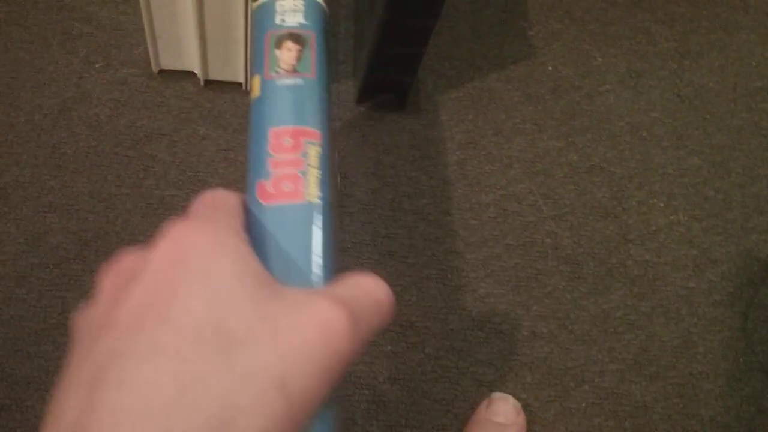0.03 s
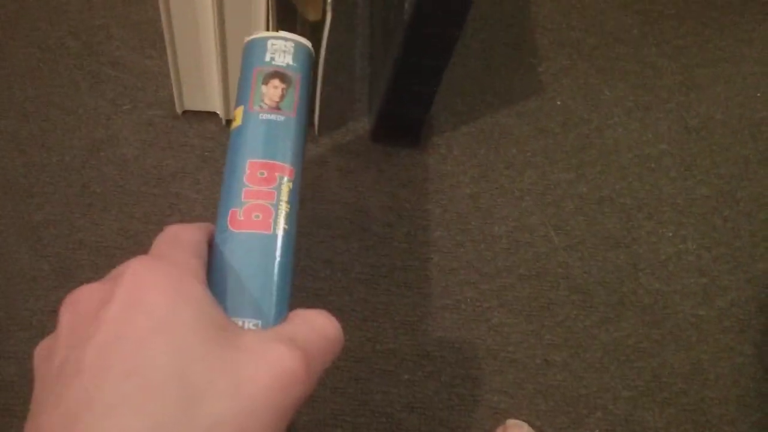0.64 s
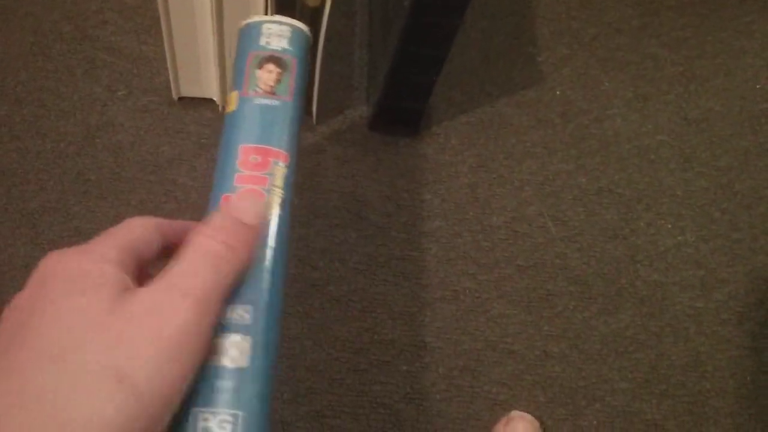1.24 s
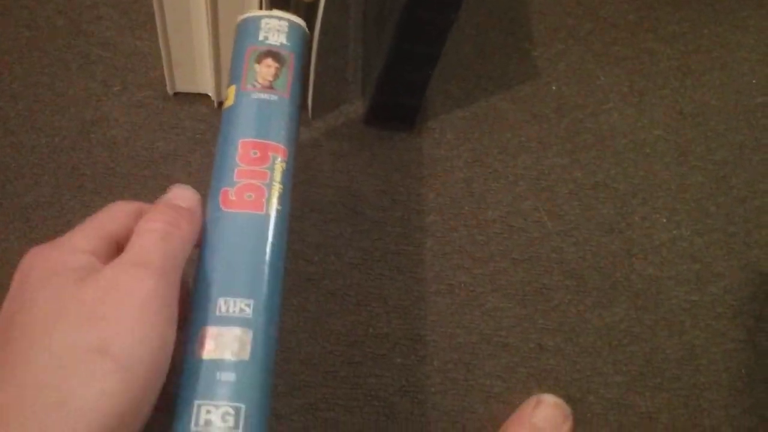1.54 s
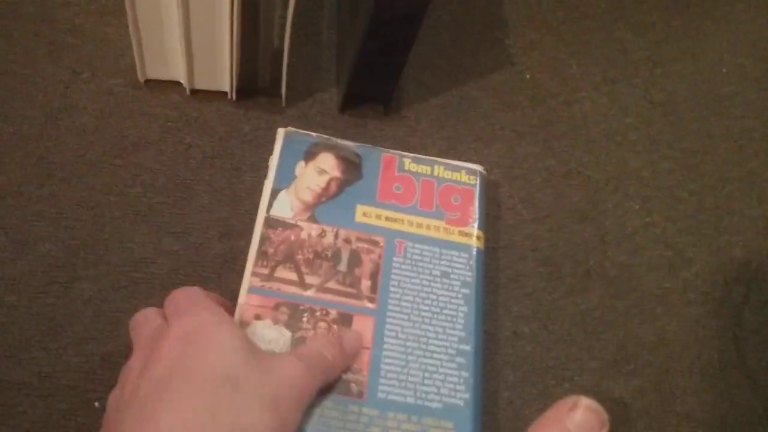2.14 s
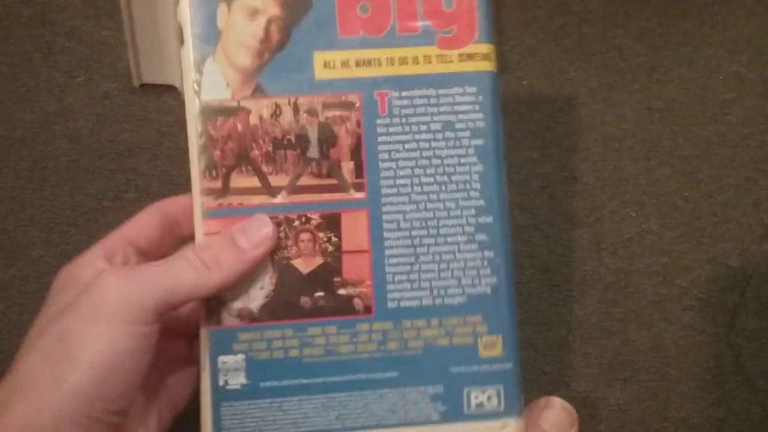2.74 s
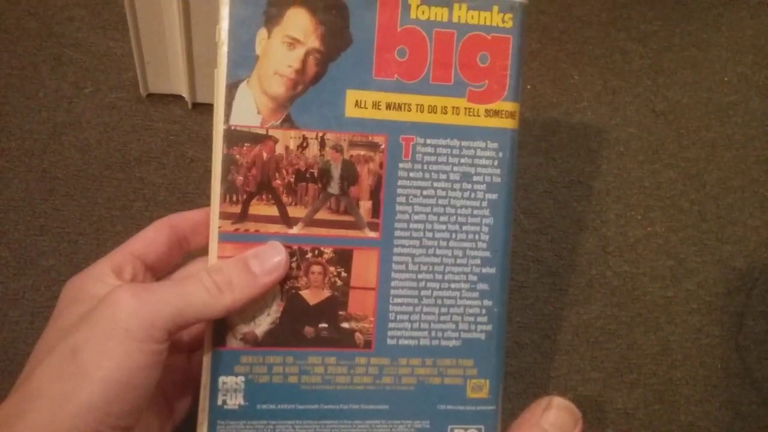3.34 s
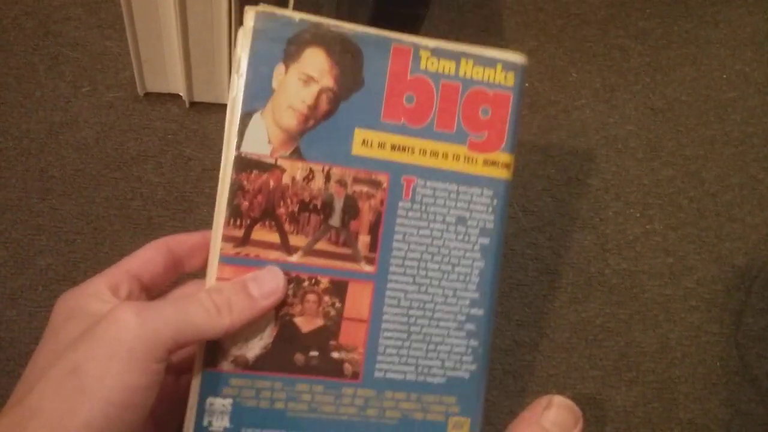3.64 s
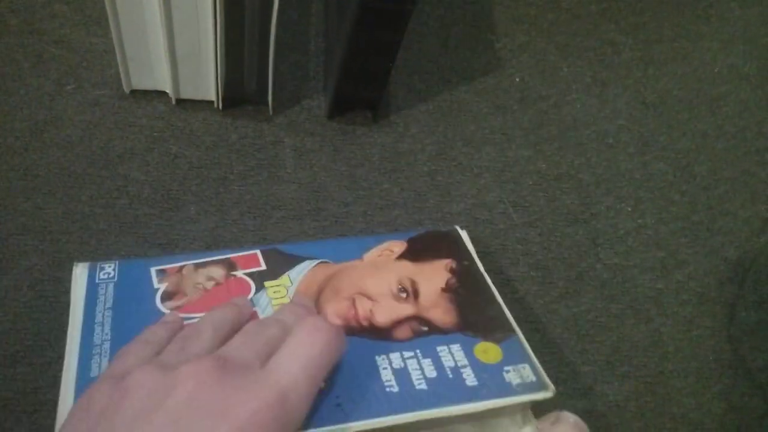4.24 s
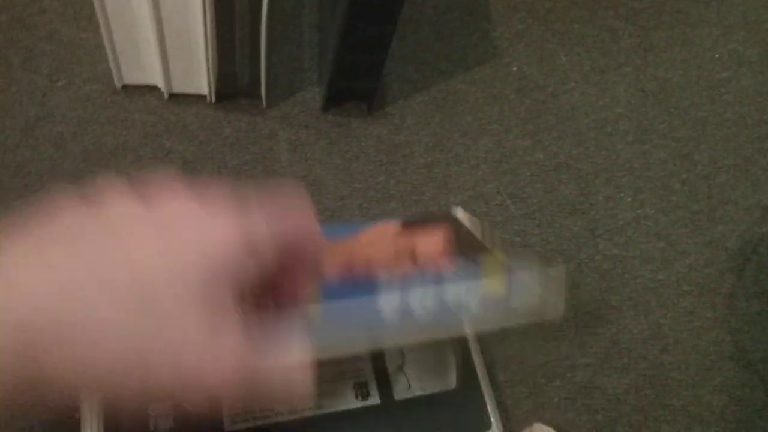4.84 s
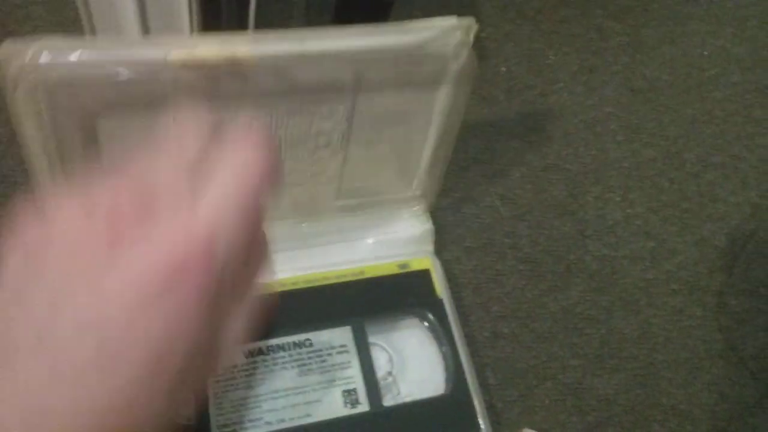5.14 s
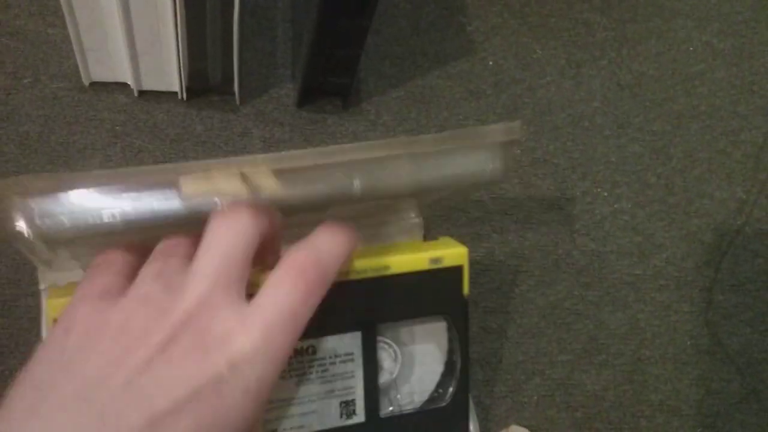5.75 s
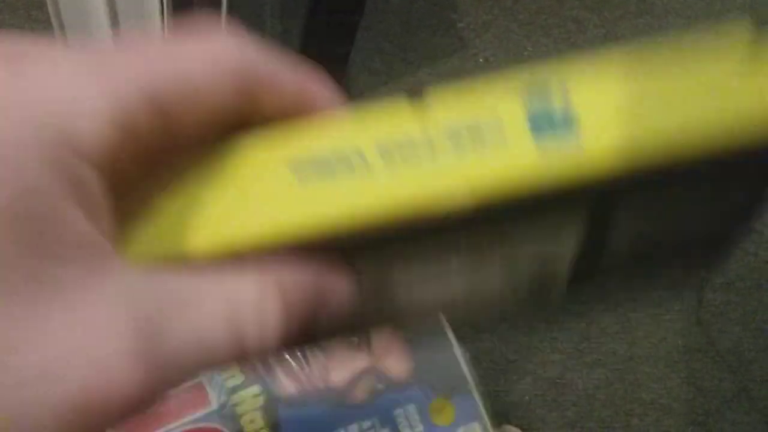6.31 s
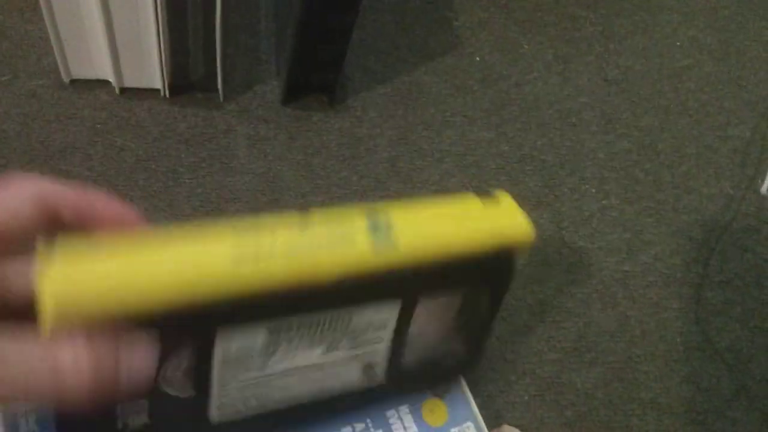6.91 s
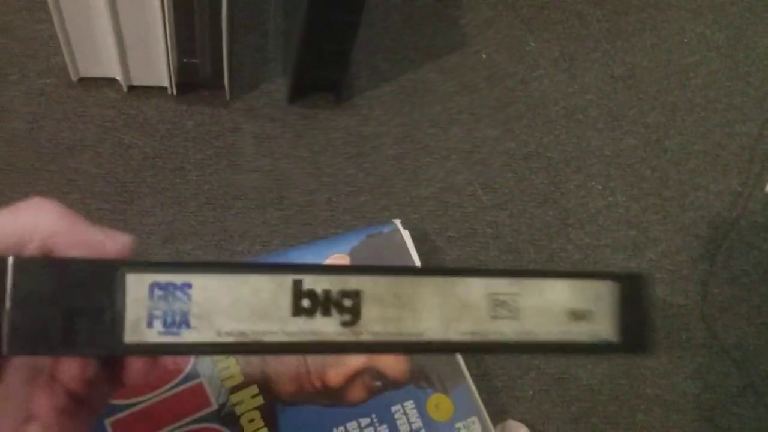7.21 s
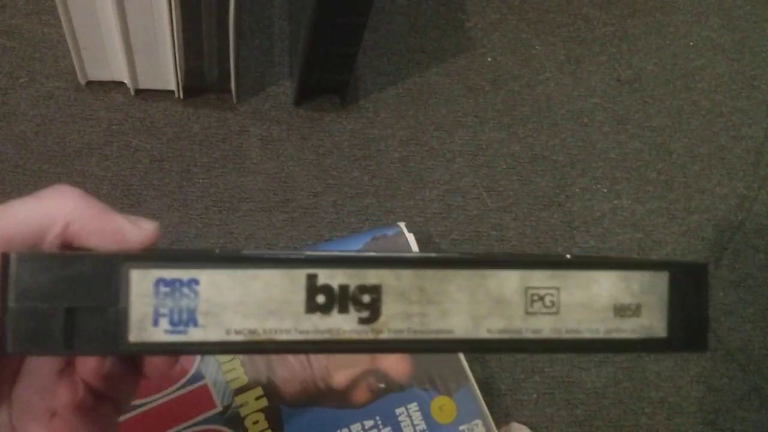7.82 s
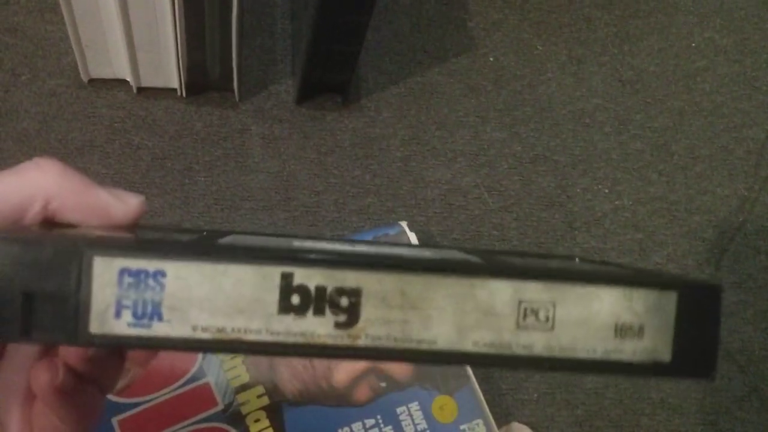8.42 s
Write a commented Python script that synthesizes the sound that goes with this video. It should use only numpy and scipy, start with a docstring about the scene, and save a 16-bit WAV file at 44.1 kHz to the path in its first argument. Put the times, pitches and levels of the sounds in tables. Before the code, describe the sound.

A plastic video cassette case is handled in a small room, knocking, snapping open, rattling as the tape comes out, then falling shut.

```python
"""A low hum and a thin high whine hang in a small furnished room. A plastic case clicks out of a row
(0.1 s), knocks hollowly onto the carpet (2 s) and is turned over (4 s), fingers brushing and squeaking
on its cover. Its rim snaps open slip by slip (4.7 s). The cassette scrapes, rattles and judders out of
its tray (5.7 s), the lid falls shut (6.6 s) and the cassette clicks faintly in the hand (7 s).
The room answers each contact."""
import sys
import numpy as np
from scipy import signal
from scipy.fft import rfft, irfft, next_fast_len
from scipy.io import wavfile
from scipy.ndimage import map_coordinates

SR = 44100
rng = np.random.default_rng(int(sys.argv[2]) if len(sys.argv) > 2 else 0)


def wav_out(sig):
    """Save sig, one row per channel (or a flat mono array), as 16-bit PCM at SR to the path in sys.argv[1]."""
    wavfile.write(sys.argv[1], SR, np.round(np.clip(np.atleast_2d(sig).T, -1, 1) * 32767).astype(np.int16))


N = 377937
T = np.arange(SR // 6) / SR  # t/s within one contact


def amp(db):
    """dB to gain."""
    return 10 ** (np.asarray(db) / 20)

def unit(x):
    """Scale to rms 1."""
    return x / np.sqrt(np.mean(x ** 2) + 1e-20)

def along(points, hz):
    """Interpolate (f/Hz, value) points over log frequency."""
    f, v = np.transpose(points)
    return np.interp(np.log(hz + 1), np.log(f + 1), v)

def fade(t, t60_s):
    """Exponential decay, 60 dB in t60_s."""
    return np.exp(-np.log(1000) * t / np.maximum(t60_s, .002))

def wobble(knots_per_s):
    """Smooth random curve."""
    knots = rng.standard_normal(int(N * knots_per_s / SR) + 4)
    return map_coordinates(knots, [np.arange(N) * knots_per_s / SR])

def filtered(x, response):
    """Apply response(hz) to x."""
    n = x.shape[-1]
    size = next_fast_len(n + 4096)
    return irfft(rfft(x, size) * response(np.fft.rfftfreq(size, 1 / SR)), size)[..., :n]

def coloured(x, spectrum):
    """Minimum-phase filter through (f/Hz, level/dB) points."""
    def response(hz):
        cepstrum = irfft(np.log(np.maximum(amp(along(spectrum, hz)), 1e-6)))
        half = len(cepstrum) // 2
        cepstrum[1:half] *= 2
        cepstrum[half + 1:] = 0
        return np.exp(rfft(cepstrum))
    return filtered(x, response)

def stereo(pair, coherence):
    """Blend two independent signals to a given L-R coherence."""
    angle = lambda hz: np.arccos(np.clip(along(coherence, hz), 0, 1)) / 2
    mid, side = filtered(pair, lambda hz: np.array([np.cos(angle(hz)), np.sin(angle(hz))]))
    return np.array([mid + side, mid - side])

def from_left(x, lag_s):
    """Right channel trails left by lag_s."""
    return filtered(x, lambda hz: np.exp(1j * np.pi * hz * lag_s * np.array([[1], [-1]])))

def add(track, at_s, sound):
    """Mix sound into track at at_s."""
    start = round(at_s * SR)
    sound = sound[..., max(-start, 0):]
    part = track[:, max(start, 0):][:, :sound.shape[-1]]
    part += sound[..., :part.shape[-1]]

def burst(spectrum, t60_s, width, rise_s):
    """Dense damped modes as decaying noise; width scales the part that differs L to R."""
    noise = rng.standard_normal(len(T)) + width * rng.standard_normal((2, len(T)))
    decay = fade(T, t60_s)
    envelope = decay * (1 - np.exp(-T / rise_s))
    return unit(coloured(noise * envelope, spectrum)) * np.sqrt(np.mean(decay ** 2))

def ring(modes, t60_s, scatter_db):
    """Distinct modes, strengths random per blow and channel; t60_s adds to their own damping."""
    hz, width_hz, db = np.transpose(modes)
    scatter = rng.standard_normal(len(hz)) + .5 * rng.standard_normal((2, len(hz)))
    gain = amp(db + scatter_db * scatter)
    decay = np.exp(-np.pi * width_hz[:, None] * T) * fade(T, t60_s)
    swing = np.sin(2 * np.pi * hz[:, None] * T) * decay
    return 2 * (gain * rng.choice([-1, 1], len(hz)) / np.linalg.norm(gain)) @ swing

def spot_modes(hz, damping):
    """One main and two weaker modes of a touched spot: f/Hz, width/Hz, level/dB."""
    return [(hz * ratio, hz * ratio * damping, db) for ratio, db in [(1, 3), (1, -16.5), (.81, -7.5)]]

def flex(hz, t60_s, rise_s):
    """Lowest bending mode, softly pushed."""
    return np.sin(2 * np.pi * hz * T) * fade(T, t60_s) * (1 - np.exp(-T / rise_s))


AIR_SPECTRUM = [(25, -23.5), (50, -14), (88, -2), (157, -4.5), (250, -11), (400, -4.5), (500, -6.5),
                (650, -12.5), (1200, -17.5), (2300, -22.5), (3600, -31.5), (5200, -34.5), (6500, -33),
                (8000, -39), (15700, -37)]  # room noise: f/Hz, level/dB
AIR_LEVELS = [(0, -59), (2, -59.5), (3.7, -61), (5, -58.5), (6.9, -59.5), (7.6, -63.5), (8.57, -60.5)]  # its slow drift: t/s, level/dB
AIR_COHERENCE = [(60, 1), (180, 0.49), (550, 0.44), (1200, .45), (2200, 0.11), (4000, 0)]  # its L-R likeness: f/Hz, coherence
HUM_LINES = [(97, -81.5), (125, -81), (151, -73), (302, -74.5), (398, -72), (455, -76.5), (500, -71.5),
             (1190, -90.5), (1560, -89)]  # electrical hum: f/Hz, level/dB
def air_and_hum():
    """Still room air and an electrical hum whose lines waver."""
    t = np.arange(N) / SR
    noise = stereo(rng.standard_normal((2, N)), AIR_COHERENCE)
    air = unit(filtered(noise, lambda hz: amp(along(AIR_SPECTRUM, hz))))
    hum = np.zeros(N)
    for hz, db in HUM_LINES:
        peak = np.sqrt(2) * amp(db - 1 + 1.8 * wobble(4.8))
        hum += peak * np.sin(2 * np.pi * hz * t + .55 * wobble(4.5))
    air_db = np.interp(t, *np.transpose(AIR_LEVELS)) + .75 * wobble(7)
    return amp(air_db) * air + hum


def whine(sound, line_hz=15600):
    """Thin steady tone that flares after sharp sounds."""
    flare = filtered(sound, lambda hz: 1 / (1 + 1j * (hz - line_hz) / 2.5))
    return amp(-75) * np.sin(2 * np.pi * line_hz * np.arange(N) / SR) + amp(22) * flare


BOX_SPECTRUM = [(60, -35), (150, -11), (280, 0), (480, 0), (680, -9), (1300, -34.5)]  # hollow box, lightly touched: f/Hz, level/dB
CLACK_SPECTRUM = [(250, -29.5), (550, -4.5), (850, -0.5), (1400, -5.5), (2300, -5.5), (3200, -15),
                  (6000, -42.5)]  # struck faces: f/Hz, level/dB
TICK_SPECTRUM = [(1200, -34.5), (2500, -4), (3800, -3), (5000, -3.5), (6600, 1), (7600, -12.5),
                 (9000, -18.5), (12000, -19.5), (16000, -21)]  # struck edges: f/Hz, level/dB
PANEL_MODES = [(474.89, 14, 3), (811.8, 31, -4), (859.99, 31, 1.5), (1280, 27, -9.5), (1488.5, 27, -7),
               (1780, 51, -7.5), (2399.3, 42, -11)]  # flat faces: f/Hz, width/Hz, level/dB
def clicks(rows, modes=PANEL_MODES, ring_db=-21, gain_db=-.5, rise_s=.00077, drag_db=-17):
    """An edge drags with growing force, then lets go: tick, clack and a little of the box."""
    out = np.zeros((2, N))
    for at_s, db, hz, body_db, tick_db, t60_s, pan_db in rows:
        body = amp(1) * burst(BOX_SPECTRUM, 2 * t60_s, width=.35, rise_s=.0013)
        clack = amp(-5.5) * burst(CLACK_SPECTRUM, t60_s, width=3, rise_s=rise_s)
        clack += amp(-4.5) * ring(spot_modes(hz, damping=.08), 1.5 * t60_s, scatter_db=2.5)
        clack += amp(ring_db) * ring(modes, t60_s=.06, scatter_db=4.5)
        tick = amp(2) * burst(TICK_SPECTRUM, t60_s, width=4, rise_s=rise_s)
        force = amp(db + gain_db + np.array([[pan_db], [-pan_db]]) / 2)
        add(out, at_s, force * (clack + amp(body_db) * body + amp(tick_db) * tick))
        drag = burst(CLACK_SPECTRUM, t60_s=.016, width=.62, rise_s=.0005)[:, ::-1]
        add(out, at_s - T[-1], force * amp(drag_db) * drag)
    return out


# edge catches: t/s, level/dB, f/Hz, tick re clack/dB, L-R/dB
EDGE_CATCHES = [(0.0541, -46, 2954, -5, -0.5), (0.1603, -29.5, 2425, -4.5, -0.5),
                (0.2228, -27.5, 2109, -9, 0), (0.3392, -35.5, 2021, -12, 2.5), (1.1771, -67, 4805, 12, 1.5),
                (2.3367, -32, 1206, -8.5, 2.5), (2.492, -50, 2307, 8.5, -9.5),
                (2.6353, -61.5, 1710, 2.5, -13.5), (2.679, -45, 1297, -5, -2.5),
                (2.7372, -36, 1475, -8, -3), (3.932, -48.5, 1806, -9.5, 7.5),
                (3.9662, -24, 3534, -4.5, -4.5), (3.983, -32.5, 914, 2, -0.5), (4.203, -38, 1189, -8, -0.5),
                (4.478, -31, 1016, -8, 0.5), (4.9739, -32.5, 2486, -9.5, .5), (4.988, -40, 908.9, -10, 0.5),
                (5.335, -36.5, 2847, -4, -3), (5.343, -33, 2340, -4, -1), (5.365, -35.5, 2718, -10.5, -2),
                (5.3943, -26, 2493, -10, 2), (5.402, -34, 2380, -6, 0), (5.4222, -30, 2719, -10, -2.5),
                (5.465, -35, 1139, -7, -2.5), (5.652, -39.5, 1158, -18.5, -3),
                (5.718, -12.5, 979.4, -12, 1), (5.7863, -25, 887.3, -29, 0),
                (5.849, -33.5, 3641, -17.5, 0.5), (6.068, -29.5, 1760, 1.5, 0.5),
                (6.123, -34.5, 3495, -5.5, 2.5), (6.1445, -25, 3478, -9.5, 0.5),
                (6.1943, -28, 1864, -8, -1.5), (6.2672, -45.5, 3006, 3.5, -1.5),
                (6.3654, -37.5, 2153, -5, 1.5), (6.384, -29.5, 1165, -9.5, -2.5),
                (6.927, -45.5, 923, -6.5, -0.5), (6.987, -52.5, 3257, -1.5, 1), (7.099, -59, 1098, 3.5, 1),
                (7.158, -54.5, 2910, 8.5, -0.5), (7.176, -44, 3171, -4.5, 0),
                (7.2357, -54.5, 3651, 1.5, -1.5), (7.27, -44.5, 3214, -15.5, 0),
                (8.1005, -46, 672, -14, -0.5)]
def catches(t60_s=.02):
    """Click rows for single edge catches; the harder the catch, the smaller the box's share."""
    return [(at_s, db, hz, -24.5 - .35 * db, tick_db, t60_s, pan_db)
            for at_s, db, hz, tick_db, pan_db in EDGE_CATCHES]


REVERB_DECAY = [(80, 0.099), (260, 0.31), (700, .27), (2000, 0.31), (6000, .27), (14000, 0.4)]  # room tail: f/Hz, t60/s
REVERB_SPECTRUM = [(60, -7.5), (250, -5.5), (700, -6.5), (2000, -2.5), (6500, -5), (14000, -10)]  # its strength: f/Hz, level/dB
REVERB_COHERENCE = [(150, 0.85), (400, 0.9861), (1000, 0.11), (2000, 0.044)]  # its L-R likeness: f/Hz, coherence
def room(x, build_up_s=.0022):
    """Walls and furniture reflect; a fresh tail every 1/3 s stands for the case moving about."""
    out, step = np.zeros((2, N)), SR // 3
    for start in range(0, N, step):
        hz, t, noise = signal.stft(rng.standard_normal((2, SR // 2)), SR, nperseg=256)
        decay = fade(t, along(REVERB_DECAY, hz)[:, None])
        energy = np.mean(decay ** 2, axis=1, keepdims=True) * SR / 2
        decay *= amp(along(REVERB_SPECTRUM, hz))[:, None] / np.sqrt(energy)
        tail = stereo(signal.istft(noise * decay, SR, nperseg=256)[1], REVERB_COHERENCE)
        tail *= 1 - np.exp(-(np.arange(tail.shape[1]) / SR / build_up_s) ** 2)
        add(out, start / SR, signal.fftconvolve(x[:, start:start + step], tail, axes=1))
    return out


# weight settling on carpet: t/s, level/dB, f/Hz
FLOOR_THUMPS = [(.378, -33, 61.7), (2.056, -23, 92.98), (2.086, -26, 83.98), (4.228, -23.5, 83.18),
                (4.264, -23, 65.45), (4.323, -36.5, 66.74), (4.484, -33.5, 122.4), (4.8, -32.5, 72.4),
                (6.407, -38, 121.1), (6.617, -24, 79.98), (6.655, -15.5, 70.97)]
def thumps():
    """The carpeted floor takes the weight in a few slow swings."""
    out = np.zeros((2, N))
    for at_s, db, hz in FLOOR_THUMPS:
        add(out, at_s, amp(db + 5) * flex(hz, t60_s=.08, rise_s=.026))
    return out * amp([[.9], [-.9]])


# hollow case, hard blow: f/Hz, level/dB
THUD_SPECTRUM = [(30, -31.5), (100, -17.5), (200, 4), (450, 1), (650, -8.5), (1200, -47.5)]
def knock(hz, clack_db, clack_hz, tick_db, t60_s):
    """The hollow case booms, its faces clack, its edges tick."""
    body = amp(5.5) * flex(hz, t60_s, rise_s=.0016)
    body = body + amp(-6.5) * burst(THUD_SPECTRUM, 1.2 * t60_s, width=.41, rise_s=.00075)
    clack = amp(-5) * burst(CLACK_SPECTRUM, .76 * t60_s, width=1, rise_s=.0008)
    clack += amp(-3) * ring(spot_modes(clack_hz, damping=.03), .7 * t60_s, scatter_db=.5)
    clack += amp(-13.5) * ring(PANEL_MODES, t60_s=.32, scatter_db=3)
    tick = amp(-3) * burst(TICK_SPECTRUM, 1.6 * t60_s, width=1.3, rise_s=.0008)
    return body + amp(clack_db) * clack + amp(tick_db) * tick


# landings and slaps: t/s, level/dB, body f/Hz, clack re body/dB, clack f/Hz, tick re body/dB,
# t60/s, corner lead/s
CASE_BLOWS = [(1.9771, -20, 317.1, 0, 656.3, -12.5, 0.0363, 0.013173),
              (1.9833, -22.5, 433.1, 6, 1125, -11, 0.01894, 0.000827),
              (2.007, -18.5, 276.5, -19.5, 982, -18, 0.04967, 0.000393),
              (2.0575, -13, 213.1, -1.5, 733.3, -14.5, 0.03548, 0.009816),
              (2.538, -34, 384.7, -10, 1004, -24.5, 0.04155, 0.004326),
              (2.568, -36.5, 318, -12.5, 1319, -38, 0.0404, 0.00062),
              (3.9663, -26.5, 266.4, 1, 890.7, -12, 0.06293, 0.006117),
              (4.008, -30.5, 261.3, -22.5, 596.2, -16, 0.0502, 0.00047),
              (4.212, -29, 281.9, -8, 641.6, -19.5, 0.08415, 0),
              (4.2303, -24, 436.8, -0.5, 1342, -13.5, 0.04348, 0.000306),
              (4.304, -30.5, 253.8, -33, 1180, -36.5, 0.03055, 0.000816),
              (4.487, -32, 406.9, -2.5, 975.5, -10.5, 0.030275, 0.00054),
              (5.353, -31.5, 506.3, -6.5, 639, -11.5, 0.028423, 0.000008),
              (5.414, -32.5, 329.4, -5, 846.4, -20.5, 0.03294, 0.00049),
              (5.455, -28, 211.5, -4, 1273, -13, 0.015876, 0.001032),
              (6.4043, -24, 187.8, 2.5, 1057, -5.5, 0.03958, 0.0008695),
              (6.413, -26, 355.7, -6, 1187, -33.5, 0.03687, 0.000489),
              (6.6162, -4.5, 436, -1.5, 879.5, -12, 0.031086, 0.005682),
              (6.6204, -7.5, 215, -14, 876.2, -18.5, .042, 0),
              (6.744, -34, 261.3, -0.5, 688.6, -10, 0.043932, 0.001215)]
def blows(rebound_s=.0125, loss_db=4):
    """A softer, lower corner usually lands first; after the blow the loose contents rebound twice."""
    out = np.zeros((2, N))
    for at_s, db, hz, clack_db, clack_hz, tick_db, t60_s, lead_s in CASE_BLOWS:
        if lead_s > 0:
            corner = knock(.76 * hz, clack_db - 7, clack_hz, tick_db, t60_s)
            add(out, at_s - lead_s, amp(db - 7) * corner)
        add(out, at_s, amp(db) * knock(hz, clack_db, clack_hz, tick_db, t60_s))
        for k in (1, 2):
            thin_rebound = knock(hz, clack_db + 11, clack_hz, tick_db + 10.5, t60_s=.045)
            add(out, at_s + k * rebound_s, amp(db - 18.5 - k * loss_db) * thin_rebound)
    return out * amp([[1.1], [-1.1]])


def friction(spectrum, slips_per_s, spread_db):
    """Many tiny slips of uneven size."""
    slips = (rng.random(N) < slips_per_s / SR) * amp(spread_db * rng.standard_normal(N))
    return unit(coloured(slips * rng.standard_normal((2, N)), spectrum))


SCRAPE_SPECTRUM = [(240, -32.5), (400, -0.5), (585, -6.5), (803, 6.5), (1250, -5), (1760, -2.5),
                   (2260, -11.5), (3450, -10.5), (5000, -19.5), (6500, -38.5), (11000, -120)]  # low friction band: f/Hz, level/dB
HISS_SPECTRUM = [(2500, -24), (4500, -10), (6600, -2.5), (8500, -14), (15000, -18)]  # high friction band: f/Hz, level/dB
STROKES = [(2.383, 0.4162, -59, -65.5), (4.138, 0.19135, -66.5, -68), (4.372, 0.42635, -57, -66.5),
           (4.47, 0.03, -46, -55.5), (5.032, 0.04286, -55.5, -57.5), (5.539, 0.11846, -56, -69.5),
           (5.71, 0.01965, -37, -47), (5.76, 0.49, -59, -73), (6.11, .1, -51.5, -54),
           (6.808, 0.16877, -60.5, -67), (7.166, 0.02122, -59.5, -76)]  # plastic on plastic and skin: t/s, length/s, scrape level/dB, hiss level/dB
def slides(attack_s=.087, release_s=.2):
    """Fingers brush the cover; the cassette scrapes along its tray."""
    scrape = friction(SCRAPE_SPECTRUM, slips_per_s=2800, spread_db=.5)
    hiss = friction(HISS_SPECTRUM, slips_per_s=2700, spread_db=2)
    out, t = np.zeros((2, N)), np.arange(N) / SR
    for at_s, length_s, scrape_db, hiss_db in STROKES:
        swell = fade(np.maximum(at_s - t, 0), attack_s)
        release = fade(np.maximum(t - at_s - length_s, 0), release_s)
        out += swell * release * (amp(scrape_db - 5) * scrape + amp(hiss_db - 5) * hiss)
    return out


# fingertips on the cover: t/s, level/dB, f/Hz, length/s
FINGER_SQUEAKS = [(2.713, -53, 1228, 0.0286), (4.439, -45.5, 946.1, 0.05739), (5.036, -47, 990, 0.04286),
                  (5.682, -49.5, 1045, 0.02242), (6.115, -49.5, 781.6, 0.054), (8.091, -53.5, 656, 0.03487)]
def squeaks():
    """Skin sticks and slips on glossy plastic in brief rough chirps."""
    out = np.zeros((2, N))
    peak = lambda hz, centre_hz: 1 / (1 + ((hz - centre_hz) / (.1 * centre_hz)) ** 2)
    for at_s, db, pitch_hz, length_s in FINGER_SQUEAKS:
        noise = rng.standard_normal(len(T))
        tone = filtered(noise, lambda hz: peak(hz, pitch_hz) + amp(-14.5) * peak(hz, 2.4 * pitch_hz))
        swell = np.sin(np.pi * np.minimum(T / length_s, 1))
        add(out, at_s, amp(db) * unit(tone * swell) * np.sqrt(np.mean(swell ** 2)))
    return out


RIM_SLIPS = [(4.6711, -27.5, 2848), (4.689, -29.5, 2832), (4.7115, -22, 2832), (4.736, -19.5, 2821),
             (4.746, -16.5, 1809), (4.7612, -10.5, 2611), (4.773, -18, 2761), (4.778, -10.5, 2380),
             (4.784, -12, 2390), (4.791, -13, 1744), (4.7948, -11, 2256)]  # lid leaving its catch, faster and harder: t/s, level/dB, f/Hz
RIM_MODES = [(893.14, 90, -4), (1192, 70, 0.5), (1750, 42, 3), (2207.8, 40, -2), (2730, 57, -6.5),
             (3313.4, 38, -9), (3669.6, 20, -9), (4968, 36, -1), (4955.3, 40, -4), (5320, 40, -11),
             (5870, 40, -7.5), (5949, 40, -6.5)]  # stiff rim: f/Hz, width/Hz, level/dB
def snaps(body_db=-10, tick_db=-3.5, t60_s=.008037, drift_db_per_s=-41.5):
    """The catch lets go along the rim, left to right; the rim slaps back after each slip."""
    rows = []
    for at_s, db, hz in RIM_SLIPS:
        pan_db = 2.5 + drift_db_per_s * (at_s - RIM_SLIPS[0][0])
        for delay_s, loss_db in [(0, 0), (.002, 6)]:
            rows.append((at_s + delay_s, db - loss_db, hz, body_db, tick_db, t60_s, pan_db))
    return clicks(rows, RIM_MODES, ring_db=-8.5, gain_db=0, rise_s=.00089, drag_db=-20)


def rattle(count=12, start_s=5.725, length_s=.5, body_db=-6, tick_db=-15, t60_s=.02):
    """Click rows for the loose cassette tapping its tray at random, once per time slot."""
    rows = []
    for k, (jitter, size, pitch) in enumerate(rng.uniform(-1, 1, (count, 3))):
        at_s = start_s + length_s * (k + (jitter + 1) / 2) / count
        db, hz = -42.5 + 2.5 * size, 1174 * 2 ** (.684 * pitch)
        rows.append((at_s, db, hz, body_db, tick_db, t60_s, 0))
    return rows


def judder(count=5, start_s=5.7657, step_s=.0588, body_db=-13, tick_db=-6, t60_s=.02854):
    """Click rows for evenly spaced catches, each on a new spot, weakening as the cassette comes free."""
    rows = []
    for k, pitch in enumerate(rng.uniform(-1, 1, count)):
        db, hz = -26.5 - 1.862 * k, 3262.5 * 2 ** (.2004 * pitch)
        rows.append((start_s + k * step_s, db, hz, body_db, tick_db, t60_s, 0))
    return rows


def scene():
    """Close handling, slightly left, in the room."""
    handling = blows() + clicks(catches() + judder() + rattle()) + snaps()
    handling += thumps() + slides() + squeaks()
    in_room = handling + room(handling) + whine(handling)
    return from_left(in_room, lag_s=.00006) + from_left(air_and_hum(), lag_s=.00031)


def record(dry, low_hz=45, top_hz=15950):
    """Deep-bass cut and steep treble limit."""
    thin = signal.sosfilt(signal.butter(4, low_hz, "highpass", fs=SR, output="sos"), dry)
    return filtered(thin, lambda hz: 1 / (1 + (hz / top_hz) ** 120))


dry = scene()
out = record(dry)
wav_out(out)
```